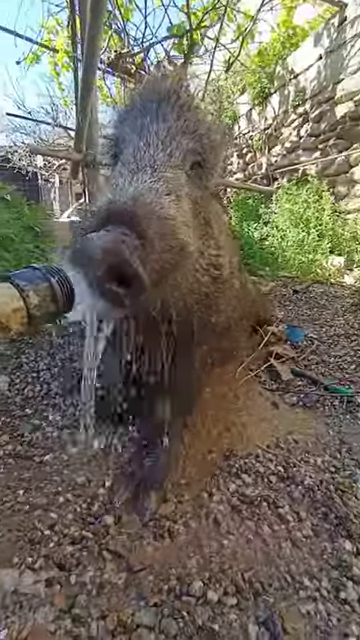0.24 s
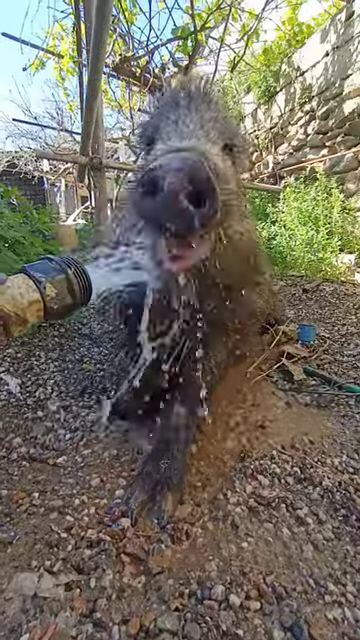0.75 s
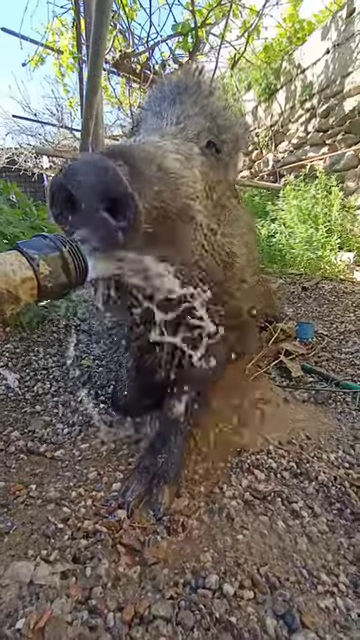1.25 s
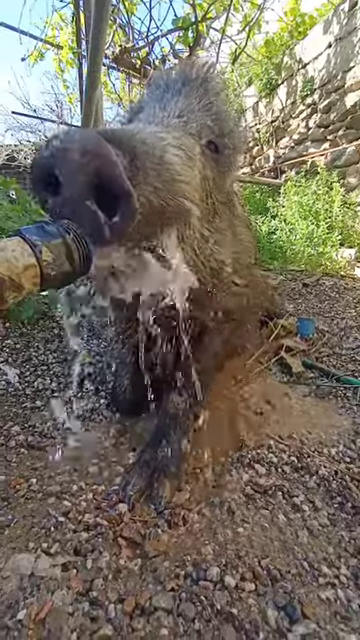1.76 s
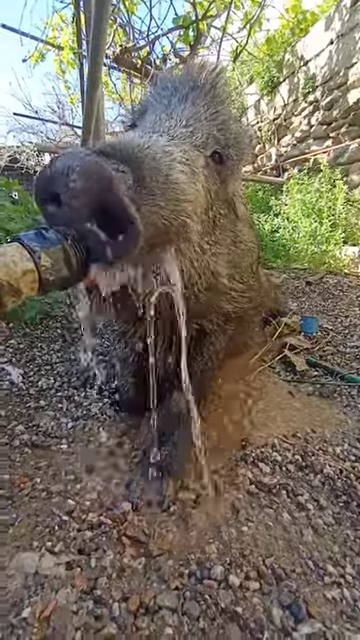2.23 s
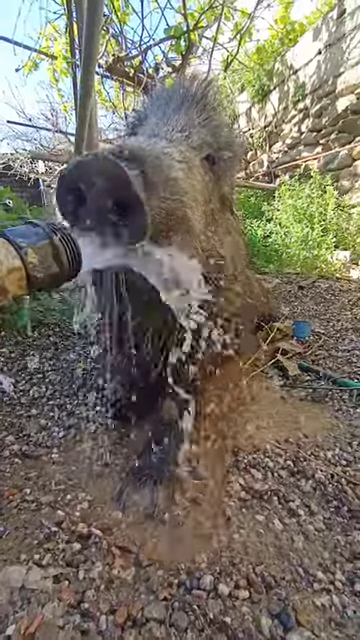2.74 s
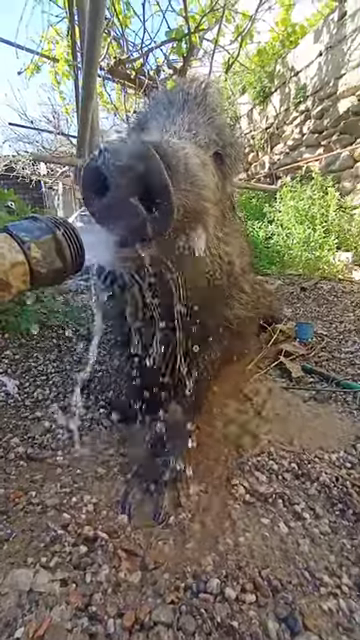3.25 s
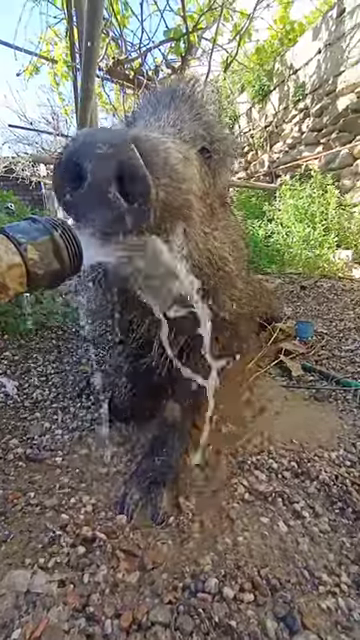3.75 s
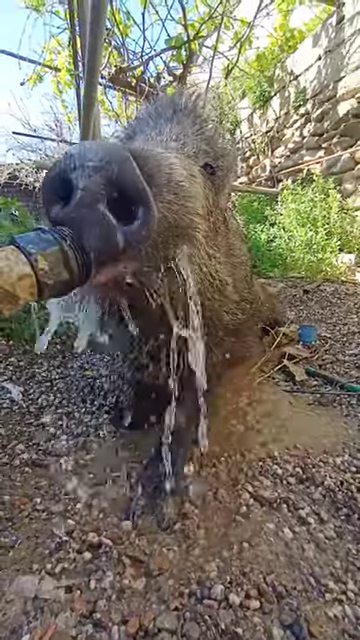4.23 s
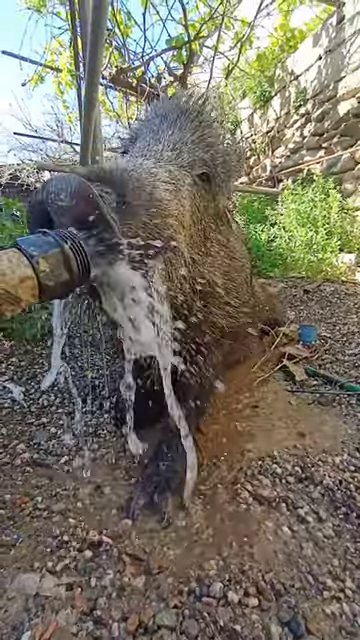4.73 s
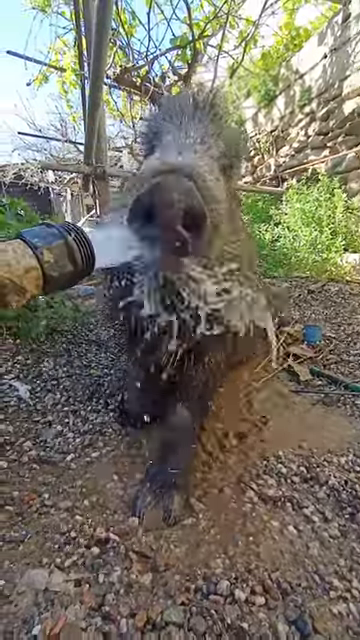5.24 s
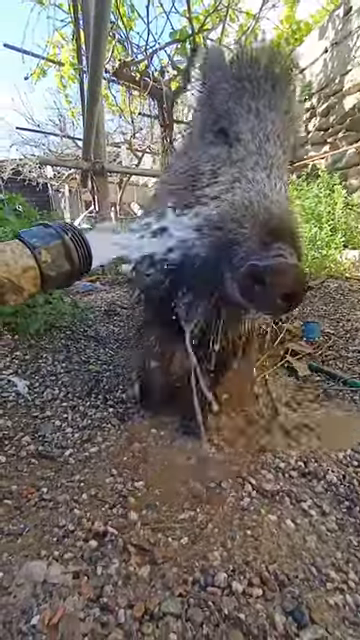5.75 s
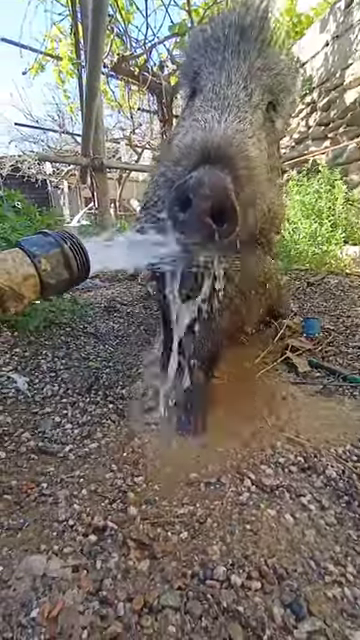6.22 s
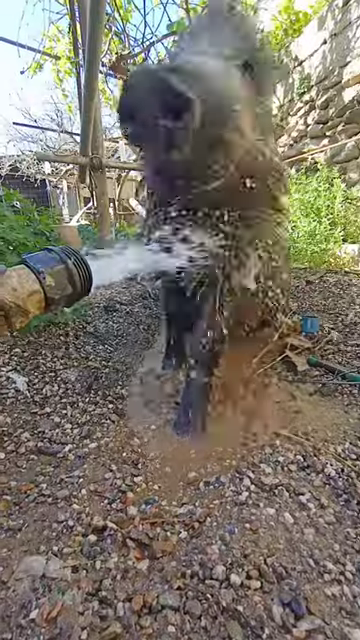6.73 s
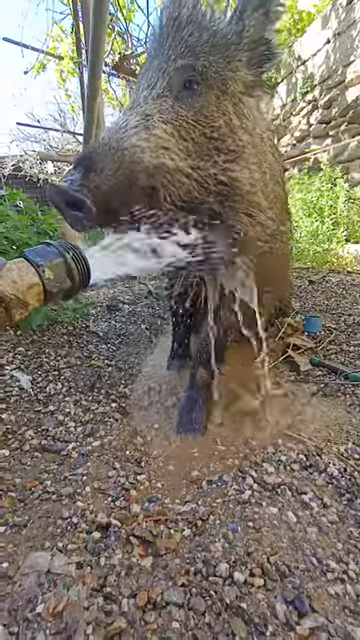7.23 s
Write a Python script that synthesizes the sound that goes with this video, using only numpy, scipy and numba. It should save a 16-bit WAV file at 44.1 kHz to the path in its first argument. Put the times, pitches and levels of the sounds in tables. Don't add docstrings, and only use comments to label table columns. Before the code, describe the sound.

Close, bright spray of water drums on bristly hide while the hose mouth roars, its pitch sinking whenever the animal's snout covers it.

```python
import sys
import numpy as np
from scipy import signal
from scipy.fft import rfft, irfft, next_fast_len
from scipy.io import wavfile
from scipy.ndimage import uniform_filter1d, minimum_filter1d
from numba import njit

SR = 44100
rng = np.random.default_rng(int(sys.argv[2]) if len(sys.argv) > 2 else 0)


def convert_level_to_amplitude(level_db):
    exponent = np.asarray(level_db, float) / 20
    return 10 ** exponent


def digitize_waveform(pressure):
    field = np.atleast_2d(pressure).T
    bounded = np.clip(field, -1, 1)
    quanta = np.round(bounded * 32767).astype(np.int16)
    wavfile.write(sys.argv[1], SR, quanta)


N = 329858
LONG = next_fast_len(N)
HZ = np.fft.rfftfreq(LONG, 1 / SR) + 1

# time in seconds, pitch in Hz, roar level in dB.
NOZZLE = [(0, 1540, -32), (.95, 1517, -34.5), (1.6, 1416, -34), (1.93, 1365, -31.5), (2.05, 1105, -30),
          (2.2, 1010, -33), (2.34, 744, -27), (2.535, 740, -34.5), (2.6, 1270, -26.5), (2.7, 1440, -37),
          (4.3, 1490, -35.5), (4.4, 1110, -28), (4.7, 1090, -32.5), (4.78, 1160, -25.5),
          (4.88, 1520, -34.5), (5.5, 1490, -37.5), (6.6, 1540, -33.5), (7.48, 1590, -31)]
OPEN_HZ, WOBBLE = 1490, 0.023
COLLAR_HZ, COLLAR_WIDTH, COLLAR_DB = 2030, 0.061, -40.5

# frequency in Hz, level in dB.
SPLASH_COLOUR = [(500, -23), (900, -13.5), (1300, -1), (1650, 4.5), (2050, 0.5), (2450, 3), (3100, -2.5),
                 (3600, 0), (3950, 6), (4600, 1.5), (5500, -28)]
# frequency in Hz, level in dB.
FIZZ_COLOUR = [(3000, -12.5), (4200, 5.5), (5200, 7), (5400, -0.5), (6300, 0), (6450, 9.5), (6750, 4),
               (7300, -2.5), (8200, -17.5), (9500, -31.5)]
# frequency in Hz, level in dB.
MIST_COLOUR = [(6000, -6), (8400, 10), (9800, 4.5), (11200, 2), (12000, 1.5), (13600, 3), (15300, 2.5),
               (16000, -22)]
# time in seconds, frequency in Hz, extra level in dB.
BRIGHT_SPOT = [(0, 2880, 5.5), (.3, 3000, 4), (.8, 3440, 0), (1, 3500, 4.5), (1.5, 3360, 0), (1.9, 3330, 0),
               (2.3, 2670, -11), (2.58, 3300, 3), (2.7, 3550, 3.5), (2.95, 3750, -8), (3.4, 3170, -3.5),
               (3.9, 3200, -1), (4.15, 3520, 5), (4.55, 2800, 0), (4.88, 3430, 0.5), (5.3, 3550, 9.5),
               (5.65, 2840, -1), (6.1, 3560, 1.5), (7.48, 3000, 2.5)]
# time in seconds, half length in seconds,
# then the change in dB of splash, fizz and mist.
SPURTS = [(0, 0.018, 7.5, -2, -1), (0.136, 0.076, -3.5, -2, -8), (0.562, 0.14, 0, 3.5, 1.5),
          (0.81, 0.11, 0.5, -0.5, -3.5), (1.1, 0.11, 2.5, -0.5, -3.5), (1.283, 0.057, 1.5, 0.5, -1),
          (1.697, 0.26, 4.5, -0.5, -1.5), (2.286, 0.0067, -13, 8, 0), (2.43, 0.086, -2.5, -2.5, -8),
          (2.694, 0.12, 6.5, 7, -6), (3.067, 0.24, 5.5, 2.5, 1), (3.343, 0.033, 2.5, 3, -3),
          (4.13, 0.23, 4, 2, -8), (4.44, 0.0053, 16.5, 5, 4), (4.865, 0.1, 7, 6, -4),
          (5.25, 0.1, 0, -1, -7), (5.544, 0.16, 1.5, 0, 1), (5.649, 0.043, 7, 5.5, -13),
          (5.763, 0.29, 5, 1.5, 2), (6.513, 0.081, -0.5, 2, 5.5), (6.67, 0.13, 1, 0, -0.5),
          (7.21, 0.041, -2, 1, 1)]
SPLASH_DB, FIZZ_DB, MIST_DB = -33.5, -34, -51.5
SAG_DB_PER_S = (-0.02, -0.2359, -0.8)
COVER_DB = (-13, -3.5, -21)

# time in seconds, half length in seconds, level in dB,
# pitch in Hz.
SLAPS = [(0.045, 0.18, -35, 2710), (1.674, 0.02, -29.5, 805), (2.24, 0.33, -38.5, 2530),
         (2.71, 0.16, -36, 3500), (3.244, 0.23, -36.5, 2050), (3.65, 0.17, -36.5, 2100),
         (4.11, 0.25, -36.5, 3290), (4.878, 0.12, -35, 3280), (5.263, 0.18, -38, 3480),
         (4.528, 0.18, -33.5, 2600), (5.647, .03, -27, 2480), (5.835, 0.023, -34, 2100),
         (6.107, .04, -44, 810), (6.65, 0.11, -39.5, 1270), (7.21, 0.029, -38, 2600),
         (7.396, 0.043, -40, 955)]
SLAP_WIDTH = .33
# time in seconds, level in dB.
SIDE_SPRAY = [(0, -25.5), (.2, -33), (.55, -28.5), (.75, -33.5), (1, -30), (1.1, -49), (1.16, -46),
              (1.3, -70)]

# start in seconds, length in seconds, level in dB.
GULPS = [(0, 0.03, -41), (0.233, 0.27, -42.5), (0.557, 0.078, -40), (.69, 0.055, -48), (0.799, 0.086, -45),
         (1.45, 0.12, -47), (1.612, 0.092, -43), (1.792, 0.13, -47.5), (2.03, 0.27, -40.5),
         (2.345, 0.21, -34), (2.677, 0.15, -44.5), (2.873, 0.059, -45), (3.003, 0.011, -42),
         (3.33, 0.41, -50), (3.6, 0.49, -53.5), (3.85, 0.13, -47), (3.98, 0.27, -43), (4.175, 0.14, -43),
         (4.383, 0.07, -40), (4.5, .17, -44), (4.668, 0.17, -38), (4.9, 0.32, -52), (5.508, 0.067, -48.5),
         (5.615, 0.095, -41), (5.78, 0.14, -54.5), (6.26, 0.032, -58), (6.583, 0.046, -51),
         (6.74, 0.16, -40), (1.9, 0.095, -43.5), (7.237, .16, -72)]
# start in seconds, length in seconds, level in dB.
THRUMS = [(0.017, 0.031, -53), (0.227, 0.24, -44.5), (0.556, 0.037, -52), (0.697, 0.063, -50),
          (0.78, 0.068, -42.5), (1.12, 0.02, -55), (1.59, 0.023, -47), (1.794, 0.079, -52.5),
          (2.34, 0.22, -43), (2.68, 0.15, -45.5), (3.004, 0.026, -49), (3.507, 0.074, -51.5),
          (3.992, 0.028, -54), (4.038, 0.058, -50), (4.114, 0.041, -56), (4.257, 0.034, -51),
          (4.566, 0.14, -47.5), (4.764, 0.042, -50), (4.88, 0.056, -52), (4.985, 0.19, -47.5),
          (5.508, 0.04, -49), (5.624, 0.032, -56), (5.69, 0.046, -51), (5.81, 0.046, -53),
          (5.96, 0.04, -53), (6.61, 0.043, -67), (6.745, 0.11, -45)]
FILL_DB_PER_S, DRAIN_DB_PER_S = 650, 393
DRIBBLE_DB, HUM_DB = -68, -65.5

# time in seconds, peak in dB, pitch in Hz, length in cycles.
FAT_DROPS = [(0.8725, -16, 2640, 3.2), (0.9398, -20, 1970, 1.7), (1.1508, -20, 1940, 1.8),
             (1.5882, -16, 2800, 1.1), (2.073, -22, 2700, 2.4), (2.356, -19.5, 2390, 1.1),
             (2.5022, -17, 2520, 1.6), (2.703, -20, 2680, 1.8), (3.1174, -19, 2380, 1.7),
             (3.738, -20, 3220, 1.6), (4.065, -12, 3280, 1.8), (4.2009, -13, 3920, 3.3),
             (4.4364, -20, 3020, 1.1), (4.492, -17, 3140, 1.3), (4.8954, -12.5, 3140, 1.3),
             (5.574, -15.5, 2360, 4.2), (5.5926, -16, 2620, 2.5), (5.658, -11.5, 2000, 1.2),
             (5.829, -22, 2100, 3.3), (6.3125, -22, 2330, 3.5), (6.4192, -22, 2050, 2.1),
             (6.4687, -24.5, 2140, 3.3), (6.666, -19, 2340, 2.9), (6.9366, -24, 2350, 2.1),
             (7.0335, -18, 2130, 3.3), (7.152, -14, 3280, 1.8), (7.1861, -19.5, 2200, 2.8),
             (7.2204, -24, 2700, 1.8), (7.2804, -25, 2320, 2.8), (7.4093, -21, 2430, 2.8)]
BREAK_S, BREAK_PITCH, BREAK_DB = 0.004, 0.083, 4
# time in seconds, peak in dB, pitch in Hz.
DRIPS = [(0.0917, -12.5, 3200), (0.6155, -21, 2560), (0.8808, -17, 2580), (1.4027, -17.5, 2240),
         (1.5095, -22, 3300), (1.7145, -20, 3440), (1.8871, -16.5, 2560), (1.235, -18, 1970),
         (1.311, -18, 2200), (1.331, -18, 2100), (2.1632, -21, 2920), (2.2001, -22, 2810),
         (2.237, -13, 4180), (6.903, -17, 3300), (6.221, -19, 3500), (.625, -21, 2400), (.959, -20, 1600),
         (1.9477, -24, 1530), (2.0642, -17, 2730), (2.3065, -25, 2480), (2.4139, -19.5, 2600),
         (2.5895, -20, 2540), (2.6878, -6, 4000), (2.7377, -16, 3350), (2.8379, -26, 1900),
         (2.8556, -21, 2380), (3.016, -15, 3380), (3.0973, -16, 2560), (3.8586, -26, 3240),
         (3.9858, -16, 3250), (4.1135, -15, 3230), (4.1405, -14, 3200), (4.8264, -19, 3680),
         (4.8464, -16, 3130), (5.1267, -14, 3300), (5.5416, -12, 3330), (5.615, -19, 2800),
         (5.648, -7.5, 2750), (5.735, -15, 2750), (6.0057, -21, 3710), (6.0514, -19, 3400),
         (6.331, -24, 1550), (6.604, -21, 1590), (6.6734, -17, 2000), (6.668, -20, 1310),
         (6.605, -18, 2720), (5.833, -20, 2200), (6.052, -20, 2190), (6.7241, -17, 3150),
         (7.1033, -22, 1940), (7.3213, -17, 2300), (7.3736, -21, 2060)]
# time in seconds, peak in dB, pitch in Hz.
TICKS = [(0.511, -10, 5400), (0.5457, -6, 5500), (0.5711, -14, 5490), (0.6657, -7, 5500),
         (0.8565, -16, 4240), (0.8809, -11, 4830), (1.2426, -11, 4130), (1.3568, -21, 5000),
         (2.2872, -12, 6640), (2.074, -14, 6500), (2.165, -19, 6800), (2.3545, -14, 4740),
         (2.4638, -16, 4080), (2.5855, -11, 4110), (2.7018, -14, 4120), (2.7856, -9, 5160),
         (2.8833, -13, 4690), (3.2954, -10, 5040), (3.3184, -15, 4250), (3.3403, -17, 4610),
         (3.6326, -9.5, 5200), (4.0642, -13, 4000), (4.1614, -11, 4270), (4.1994, -14, 5210),
         (4.229, -4, 6300), (4.4376, -18, 4250), (4.4782, -13, 4030), (4.5136, -11, 5100),
         (4.8269, -16, 4280), (5.3462, -11, 4850), (5.472, -21, 5130), (5.511, -12, 4350),
         (5.6461, -8, 6470), (5.7553, -17, 5150), (5.7892, -12, 5180), (5.9025, -13, 5170),
         (5.994, -18, 4380), (6.4762, -11, 4800), (1.659, -18, 4500), (1.678, -23, 5000),
         (1.949, -19, 4500), (6.9366, -8, 6460), (7.2968, -7.5, 6300), (7.3692, -10, 6620),
         (7.4145, -11, 5460)]
# time in seconds, peak in dB, pitch in Hz.
CRACKS = [
    (7.2051, 0, 2700),
    (6.4765, -9, 5300),
    (2.2875, -13, 6200),
    (4.4385, -10, 4200),
    (4.4405, -16, 2000),
]
# time in seconds, peak in dB, pitch in Hz.
LIP_SMACKS = [(0.227, -32, 390), (0.388, -20.5, 980), (0.711, -38, 408), (0.871, -27, 726),
              (1.656, -25, 860), (1.792, -30, 366), (2.135, -43, 870), (2.344, -23, 770), (2.384, -17, 707),
              (2.542, -17.5, 940), (3.335, -31.5, 508), (3.42, -30.5, 670), (4.207, -17.5, 930),
              (4.386, -18, 720), (4.738, -32, 765), (4.77, -25.5, 390), (5.525, -20, 735),
              (5.612, -22.5, 900), (6.578, -27, 760), (6.752, -26, 527), (6.753, -34, 264),
              (6.754, -25, 860), (1.678, -26, 804), (1.9, -30, 790), (1.45, -33, 726), (6.85, -41, 800),
              (6.28, -43, 400), (3.95, -25, 900), (7.206, -26.5, 990), (7.24, -30.5, 726),
              (.255, -37.5, 197), (2.4, -35, 176), (4.635, -28, 487), (4.99, -35.5, 220), (5.88, -40, 380),
              (6.62, -39, 214), (6.86, -35, 443)]
# time in seconds, peak in dB, pitch in Hz.
KNOCKS = [(.255, -41, 130), (.388, -30, 330), (.443, -49, 200), (.563, -39, 170), (.713, -45, 239),
          (.815, -35, 170), (4.9, -40, 300), (.309, -46, 124), (.703, -44, 105), (1.125, -44, 130),
          (1.15, -48, 60), (1.19, -49, 80), (1.24, -49, 70), (1.622, -37, 85), (1.85, -48, 85),
          (1.945, -46, 120), (2.76, -44, 80), (3.0, -49, 90), (3.42, -46, 110), (3.7, -50, 71),
          (4.041, -62, 125), (4.42, -54, 70), (5.041, -43, 118), (5.16, -53, 121), (6.474, -49, 108),
          (6.745, -48, 160)]

# frequency in Hz, level in dB.
YARD_COLOUR = [(25, -34), (60, -20), (120, -14), (300, 11.5), (600, 29), (1100, -5), (1600, 32),
               (2500, -24)]
# frequency in Hz, likeness from 0 to 1.
ALIKE = [(40, 0.2), (150, 0.7), (1600, 0.62), (1800, 0.79), (2000, 0), (2250, 0.24), (3400, 0.53),
         (4000, 0.18), (6500, 0.12), (9000, 0.23)]
# frequency in Hz, head start of the left in ms.
LEAD = [(200, 0.096), (800, 0.33), (1500, 0.22), (2600, 0.22), (5000, 0.17)]
# frequency in Hz, level in dB.
OVERALL_COLOUR = [(30, -13), (90, -4), (1620, 1.5), (1700, 0), (1770, -4.5), (1860, 3), (2030, 1), (2300, 2.5),
                  (3100, 4.5), (3550, 3), (3900, -3)]
# frequency in Hz, left minus right in dB.
TILT = [(200, 2.5), (650, -1), (1000, 1.5), (1350, 6.5), (1700, 2), (2100, 3.5), (2500, -0.5), (3100, 0),
        (4000, -2.5), (4800, 2), (6500, -2), (8200, -2), (10000, -5), (15000, -15)]
# frequency in Hz, share of the time from 0 to 1.
HUNGER = [(7600, 0), (7950, .13), (8700, .09), (9800, .1), (10800, .04), (13000, .03), (14800, .015),
          (15200, .2), (15500, .5)]


def along(table):
    s, *columns = np.transpose(table)
    return [np.interp(np.arange(N) / SR, s, c) for c in columns]


def over(points):
    hz, value = np.transpose(points)
    return np.interp(np.log(HZ), np.log(hz), value)


def unit(x):
    return x / np.sqrt(np.mean(x ** 2))


def shape(x, gain):
    return irfft(rfft(x, LONG) * gain, LONG)[..., :N]


def colour(x, points):
    return unit(shape(x, convert_level_to_amplitude(over(points))))


def walk(rate):
    k = int(SR / rate)
    held = np.repeat(rng.standard_normal(N // k + 1), k)
    return 1.54 * uniform_filter1d(uniform_filter1d(held, k), k)[:N]


@njit
def svf(x, hz, share):
    y, band, low = np.empty(len(x)), 0., 0.
    for i in range(len(x)):
        g = np.tan(np.pi * hz[i] / SR)
        v = (band + g * (x[i] - low)) / (1 + g * (g + share))
        band = 2 * v - band
        low = low + 2 * g * v
        y[i] = share * v
    return y


@njit
def add_bubbles(out, start, hz, cycles, glide, size):
    for k in range(len(start)):
        n, phase = cycles[k] * SR / hz[k], 0.
        for j in range(min(int(6 * n), len(out) - start[k])):
            phase += 2 * np.pi * hz[k] / SR * (1 + glide * j / n)
            swell = 1 - np.exp(-8 * j / n)
            out[start[k] + j] += size[k] * np.sin(phase) * np.exp(-j / n) * swell


def patter(lo_hz, hi_hz, cycles, scatter_db, count):
    when, pitch = rng.random((count, 2)).T
    size = convert_level_to_amplitude(scatter_db * np.minimum(rng.exponential(size=count), 3.5))
    hz = lo_hz * (hi_hz / lo_hz) ** pitch
    out = np.zeros(N)
    add_bubbles(out, (when * N).astype(int), hz, np.full(count, cycles), .05, size)
    return unit(out)


def ports(shared, own=None):
    lead = np.exp(np.array([[1j], [-1j]]) * np.pi * HZ * over(LEAD) / 1000)
    if own is None:
        return shape(shared, lead)
    alike = np.clip(over(ALIKE), 0, 1)
    return shape(shared, np.sqrt(alike) * lead) + shape(own, np.sqrt(1 - alike))


def rush(grains, grain_db, flicker_db, rate):
    shared = rng.standard_normal(N) + convert_level_to_amplitude(grain_db) * grains
    own = rng.standard_normal((2, N)) * np.sqrt(1 + convert_level_to_amplitude(2 * grain_db))
    return ports(shared, own) * convert_level_to_amplitude(flicker_db * walk(rate))


def patchy(x, lo_hz, hi_hz, patch_db, rate, count):
    slices = np.searchsorted(np.geomspace(lo_hz, hi_hz, count), HZ)
    spectrum = rfft(x, LONG)
    out = np.zeros((2, N))
    for k in range(count + 1):
        out += irfft(spectrum * (slices == k), LONG)[:, :N] * convert_level_to_amplitude(patch_db * walk(rate))
    return out


def bursts(table, rest_db):
    t = np.arange(N) / SR
    db = rest_db + 0 * t
    for s, length, top_db in table:
        filling = FILL_DB_PER_S * np.maximum(s - t, 0)
        draining = DRAIN_DB_PER_S * np.maximum(t - s - length, 0)
        db = np.maximum(db, top_db - filling - draining)
    return convert_level_to_amplitude(db)


def hits(table, cycles, gain_db, pan_db, late_s):
    s, db, hz = np.transpose(table)[:3]
    out = np.zeros((2, N))
    for c, side in zip(out, (.5, -.5)):
        start = ((s + side * late_s) * SR).astype(int)
        add_bubbles(c, start, hz, cycles + 0 * s, .03, convert_level_to_amplitude(db + gain_db + side * pan_db))
    return out


def covered():
    return np.clip(1 - along(NOZZLE)[0] / OPEN_HZ, 0, 1)


def nozzle(surge):
    hz, db = along(NOZZLE)
    hz = hz * (1 + WOBBLE * walk(12))
    shut = covered()
    peak = convert_level_to_amplitude(6.0 - 22 * shut)
    roar = rush(patter(684, 1948, 4.8, 3.3, count=3000), -11, 0.65, 40)
    ring = []
    for c in roar:
        shoulder = svf(svf(c, 1.0 * hz, 0.69), 1.07 * hz, 1.2)
        ring.append(svf(shoulder, 1.11 * hz, 0.66) + peak * svf(shoulder, 1.023 * hz, 0.09))
    return unit(np.array(ring)) * convert_level_to_amplitude(db - 1.03 + surge + 2.1 * shut * walk(30.03))


def collar():
    air = rush(0, -60, 1.2, 12.)
    hz = np.full(N, float(COLLAR_HZ))
    ring = [svf(svf(c, hz * 1.01, COLLAR_WIDTH), hz, COLLAR_WIDTH) for c in air]
    return unit(np.array(ring)) * convert_level_to_amplitude(COLLAR_DB - 58 * covered())


def force_db():
    t = np.arange(N) / SR
    db = np.outer(SAG_DB_PER_S, t) + np.outer(COVER_DB, covered())
    for s, half, *gain_db in SPURTS:
        db = db + np.outer(gain_db, np.exp(-((t - s) / half) ** 2))
    return db


def spray(surge):
    splash_db, fizz_db, mist_db = force_db()
    hz, spot_db = along(BRIGHT_SPOT)
    hz = hz * (1 + 0.015 * walk(5.4))
    splash = colour(rush(patter(1942, 4185, 13.6, 2.2, count=4000), -6.0, 0.53, 30), SPLASH_COLOUR)
    splash = splash + convert_level_to_amplitude(spot_db) * np.array([svf(c, hz, 0.28) for c in splash])
    splash = unit(patchy(splash, 1700, 4600, 2.1, 60, count=18))
    fizz = colour(rush(patter(4100, 7520, 5.0, 4.9, count=6000), -0.44, 0.71, 25.055), FIZZ_COLOUR)
    fizz = unit(patchy(fizz, 4520, 7600, 0.95, 22.05, count=4))
    mist = colour(rush(patter(7300, 15000, 1.3, 1.8, count=6000), -4.0, 0.19, 8.8), MIST_COLOUR)
    mist = unit(patchy(mist, 9000, 13500, 1.8, 30, count=6))
    mix = convert_level_to_amplitude(splash_db + SPLASH_DB + 3.0) * splash
    mix = mix + convert_level_to_amplitude(fizz_db + FIZZ_DB + 4.5) * fizz
    mix = mix + convert_level_to_amplitude(mist_db + MIST_DB + 7.0) * mist
    return mix * convert_level_to_amplitude(0.43 * surge)


def slaps():
    t = np.arange(N) / SR
    noise = rush(patter(1000, 3000, 3., 5.5, count=3000), -4., 2., 50)
    noise = unit(noise) / np.sqrt(SLAP_WIDTH / 8)
    out = np.zeros((2, N))
    for s, half, db, hz in SLAPS:
        swell = convert_level_to_amplitude(db) * np.exp(-((t - s) / half) ** 2)
        out += swell * np.array([svf(c, hz + 0 * t, SLAP_WIDTH) for c in noise])
    return out


def side_spray():
    hiss = colour(rng.standard_normal(N), [(4600, -27), (5350, -1.0), (6250, 4.0), (6700, -44.0)])
    right_only = np.array([[0], [1]])
    return hiss * convert_level_to_amplitude(along(SIDE_SPRAY)[0] + 2.2 * walk(23.0)) * right_only


def gulp():
    slosh = rush(patter(292, 870, 2.64, 0.34, count=1500), -9.5, 1.9, 45)
    slosh = colour(slosh, [(150, -73), (230, -14), (330, -5.5), (620, 2.5), (800, 6.5), (1400, -27.5)])
    thrum = rush(patter(91.0, 251, 2.6, 0.77, count=500), -13.5, 2.4, 28)
    thrum = colour(thrum, [(40, -45), (110, -2.0), (180, -1.5), (280, -3), (450, -45)])
    return bursts(GULPS, DRIBBLE_DB + 3.2 * walk(8.1)) * slosh + bursts(THRUMS, HUM_DB) * thrum


def runoff():
    return convert_level_to_amplitude(-42) * ports(patter(1680, 3600, 3.5, 3.5, count=900))


def yard():
    air = ports(rng.standard_normal(N), rng.standard_normal((2, N)))
    return convert_level_to_amplitude(-87.0) * colour(air, YARD_COLOUR)


def shattered(count):
    rows = np.repeat(FAT_DROPS, count, axis=0)
    late, pitch, size = rng.random((len(rows), 3)).T
    piece = np.arange(len(rows)) % count != 0
    s, db, hz, cycles = rows.T
    s = s + piece * late * BREAK_S
    db = db - piece * 2 * size * BREAK_DB
    hz = hz * (1 + piece * (2 * pitch - 1) * BREAK_PITCH)
    return np.transpose([s, db, hz, cycles])


def drops():
    fat = shattered(count=4)
    out = hits(DRIPS, 4.5, 0.91, -2.5, .0001) + hits(fat, fat[:, 3], 3.6, -7, .0001)
    out = out + hits(TICKS, 4., 0, -1.5, -.0002)
    out = out + hits(CRACKS[:1], 1.1, -1, -4, .0001) + hits(CRACKS[1:], 1.4, -3, -2, 0)
    return shape(out, convert_level_to_amplitude(over([(500, -30), (1300, 0), (7000, 0), (8500, -12)])))


def lips_and_knocks():
    return ports(hits(LIP_SMACKS, 3.9, 0.43, 0, 0) + hits(KNOCKS, 1.0, 5.2, 0, 0))


def scene():
    surge = walk(14)
    jet = nozzle(surge) + collar() + spray(surge)
    water = slaps() + side_spray() + gulp() + runoff()
    return jet + water + yard() + drops() + lips_and_knocks()


def starve(x):
    hz, _, z = signal.stft(x, SR, window="cosine", nperseg=2048, noverlap=1024)
    power = uniform_filter1d(np.sum(np.abs(z) ** 2, axis=0), size=9, axis=0)
    usual = uniform_filter1d(power, size=15, axis=1)
    faint = uniform_filter1d(power, size=2, axis=1) / usual ** .85
    rank = faint.argsort(axis=1).argsort(axis=1) / power.shape[1]
    dropped = np.interp(hz, *np.transpose(HUNGER))[:, None]
    keep = minimum_filter1d(1. * (rank >= dropped), size=3, axis=1)
    keep = minimum_filter1d(keep, size=5, axis=0)
    return signal.istft(z * keep, SR, window="cosine", nperseg=2048, noverlap=1024)[1][:, :N]


def top_cut(x):
    return signal.sosfilt(signal.butter(12, 15600, fs=SR, output="sos"), x)


def record(dry):
    left_right = np.array([[.5], [-.5]])
    heard = shape(dry, convert_level_to_amplitude(over(OVERALL_COLOUR) + left_right * over(TILT)))
    mix = starve(heard)
    return top_cut(mix)


dry = scene()
out = record(dry)
digitize_waveform(out)
```